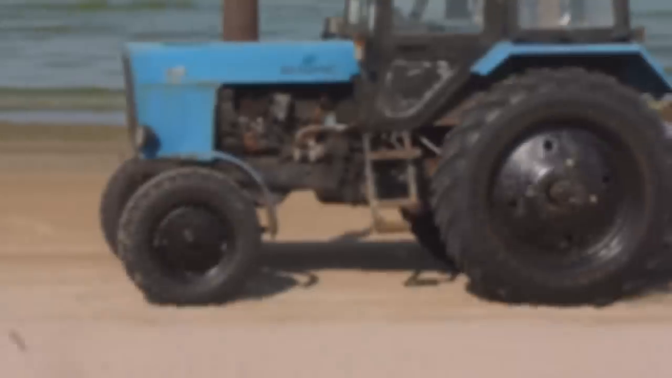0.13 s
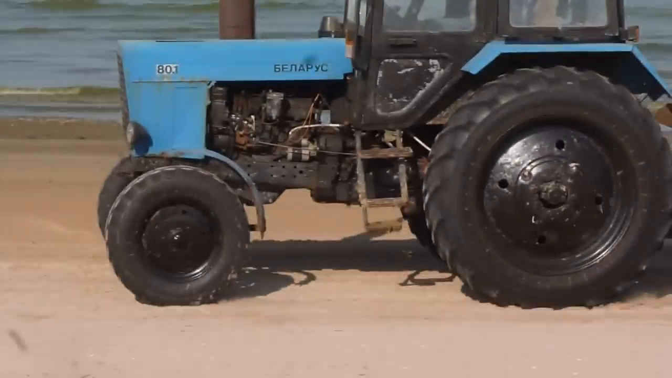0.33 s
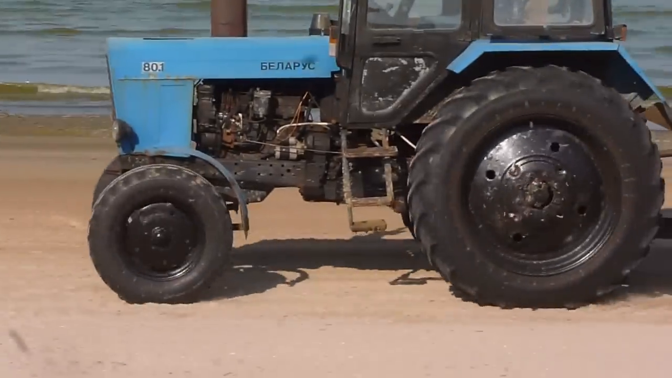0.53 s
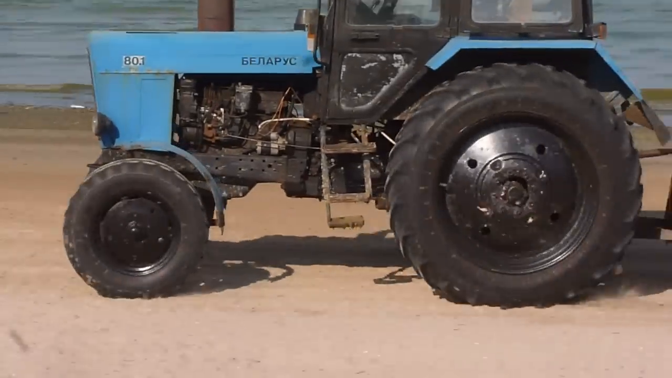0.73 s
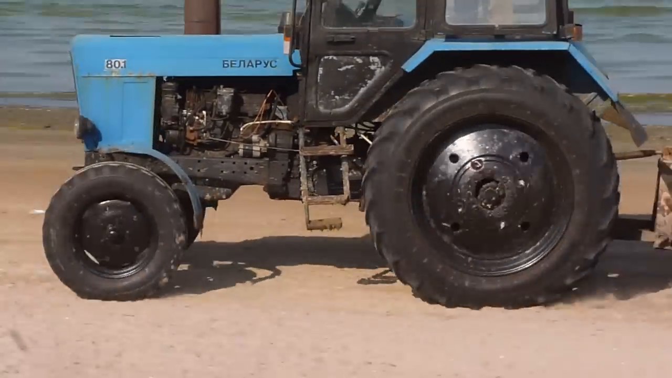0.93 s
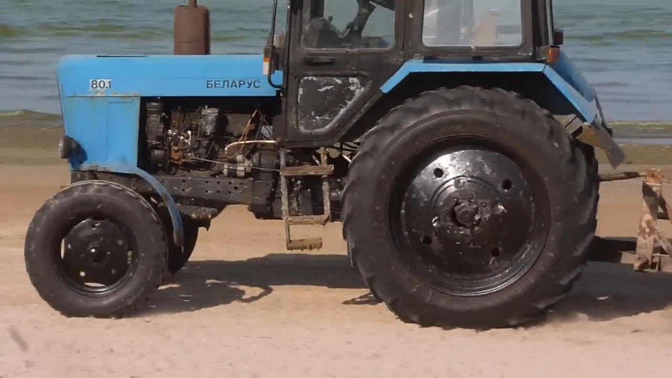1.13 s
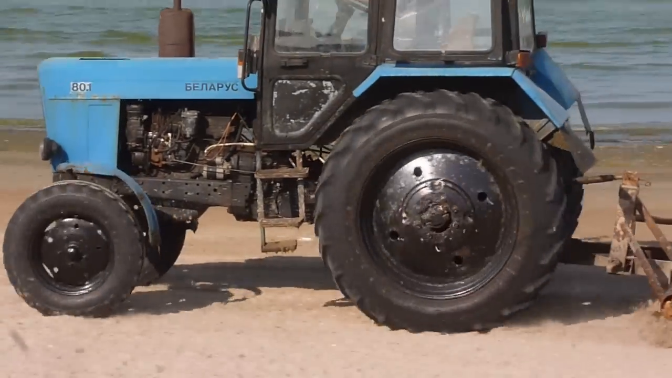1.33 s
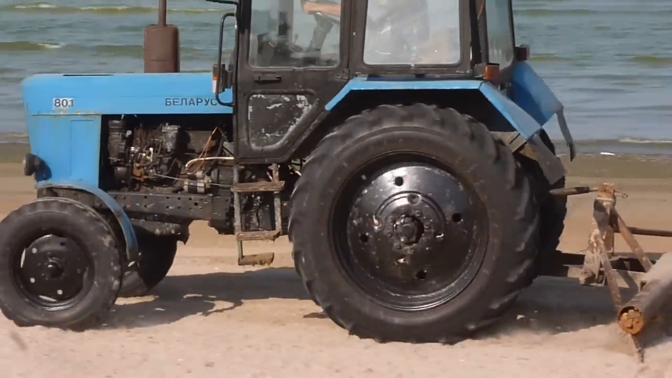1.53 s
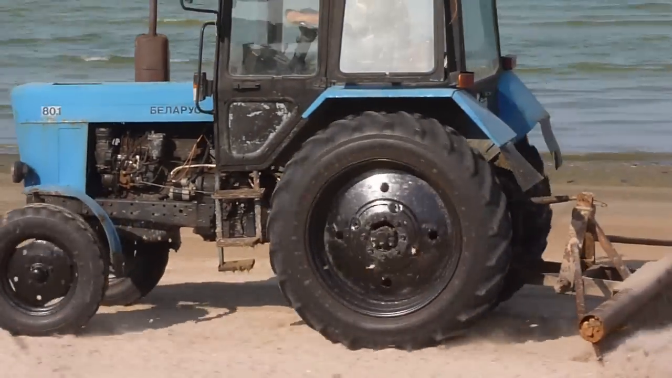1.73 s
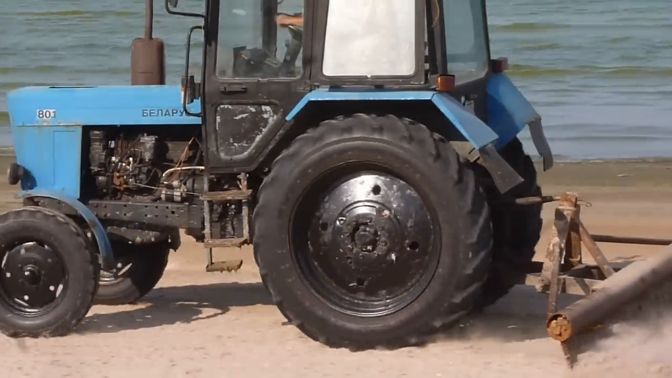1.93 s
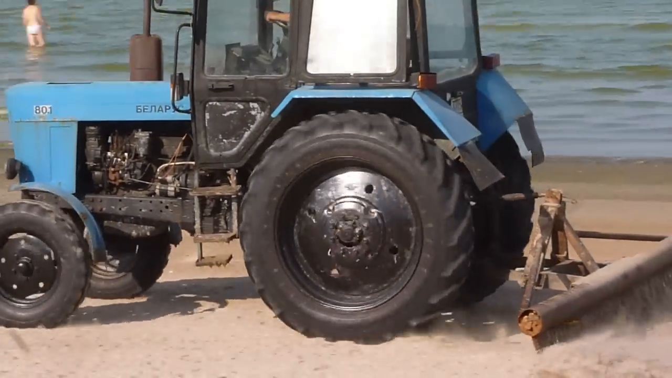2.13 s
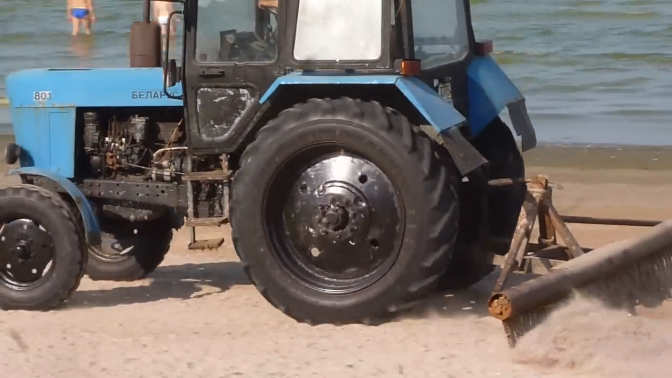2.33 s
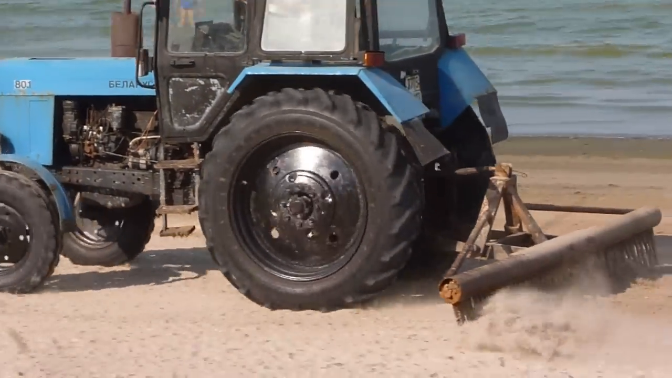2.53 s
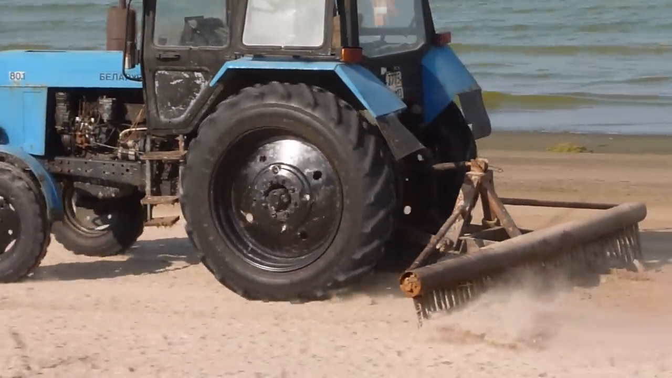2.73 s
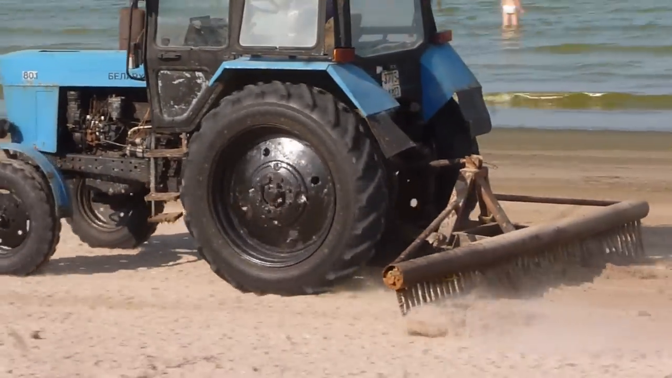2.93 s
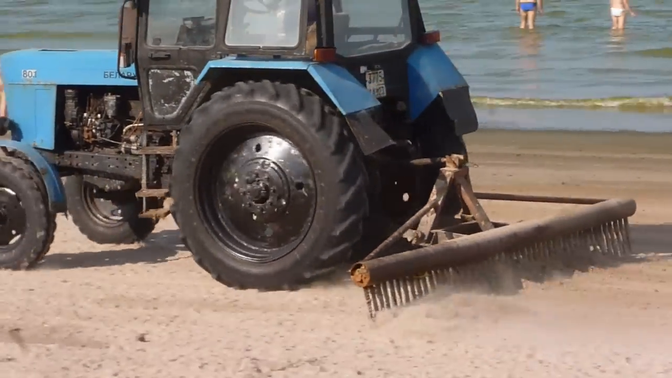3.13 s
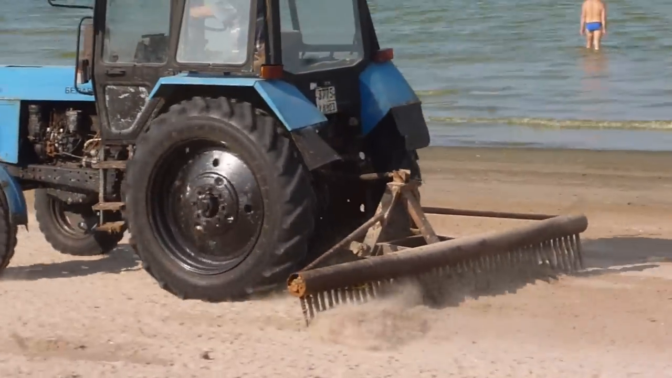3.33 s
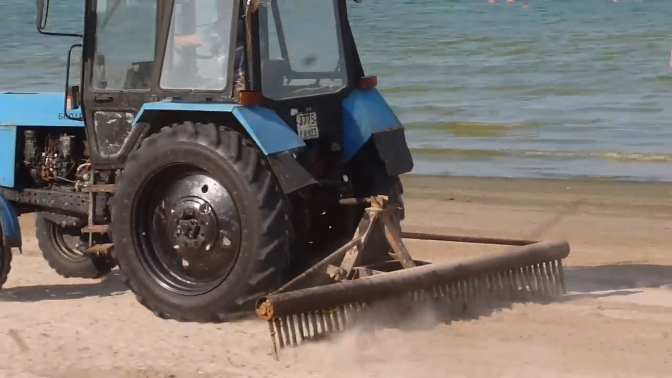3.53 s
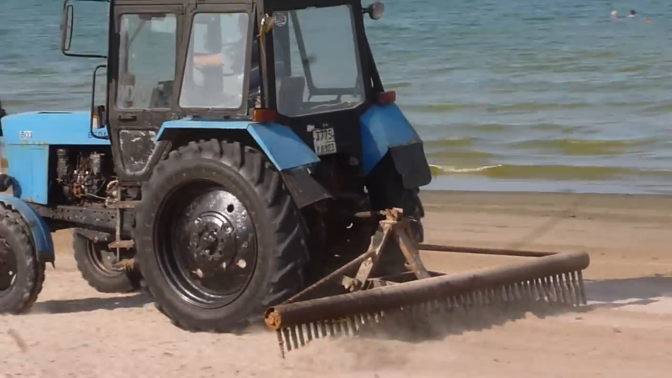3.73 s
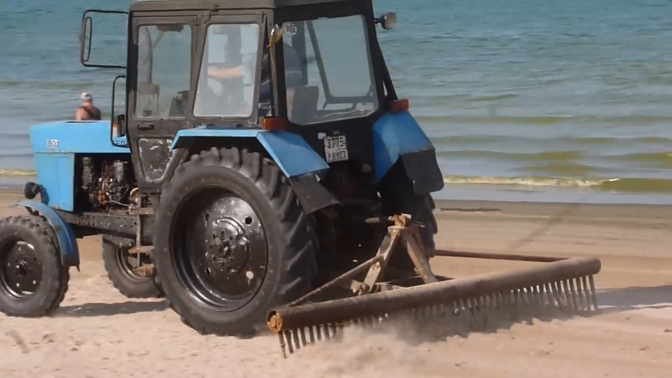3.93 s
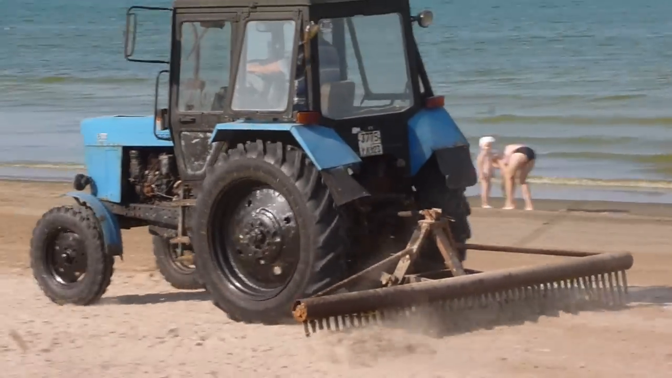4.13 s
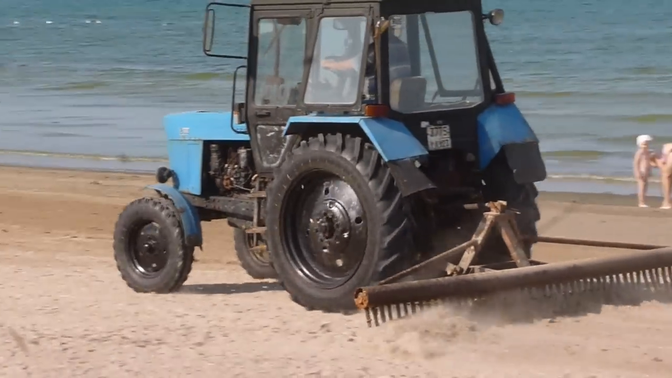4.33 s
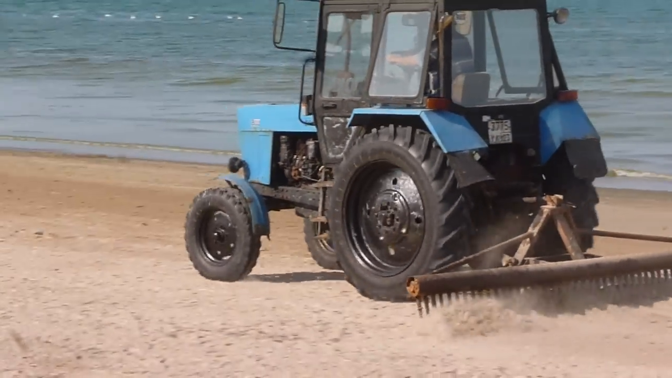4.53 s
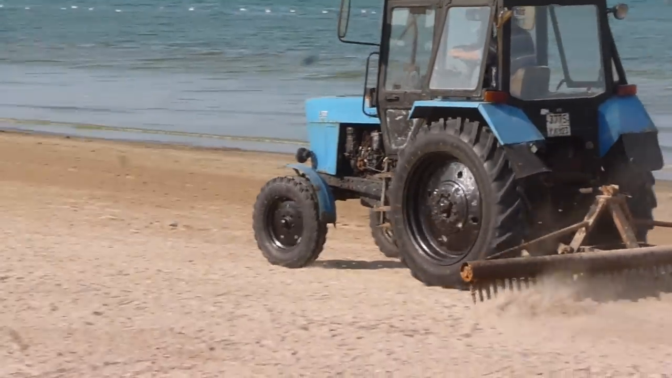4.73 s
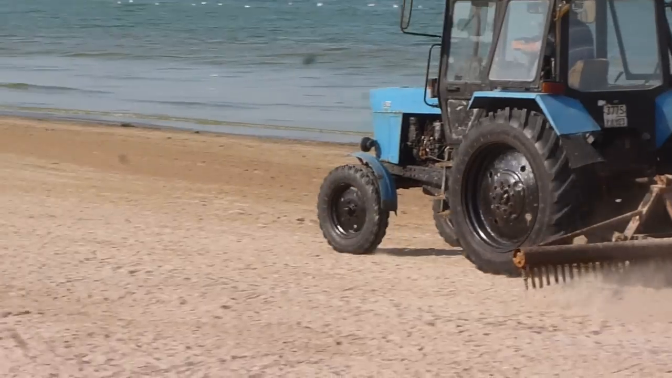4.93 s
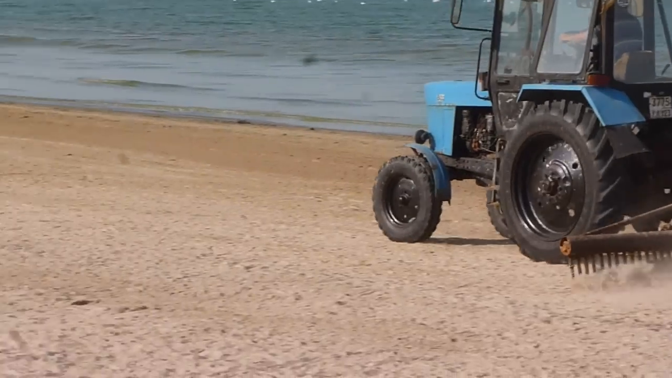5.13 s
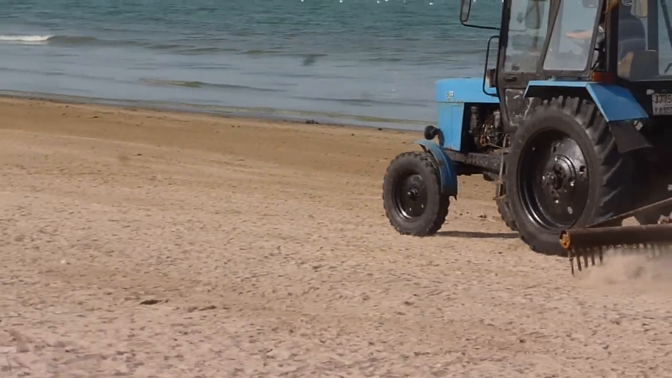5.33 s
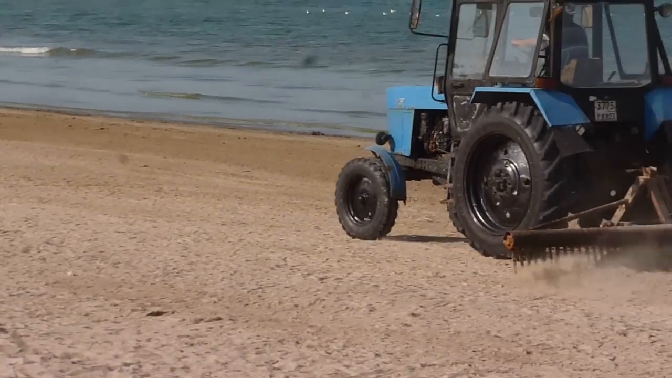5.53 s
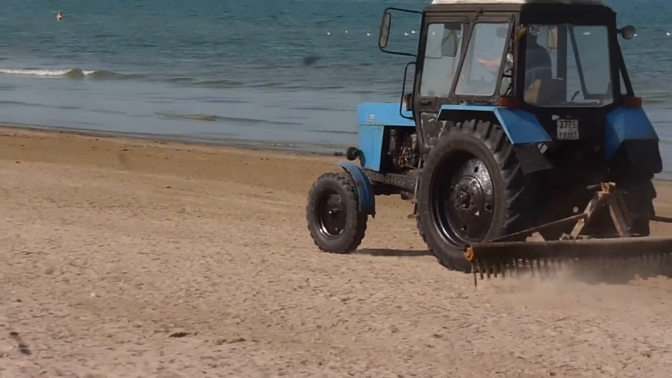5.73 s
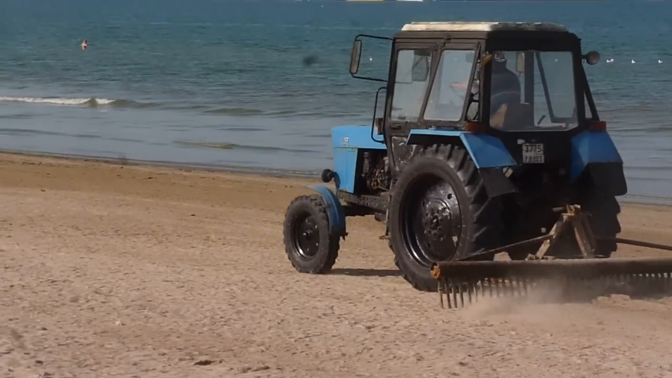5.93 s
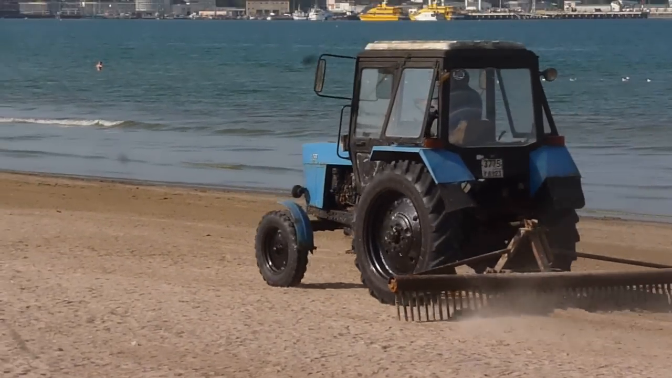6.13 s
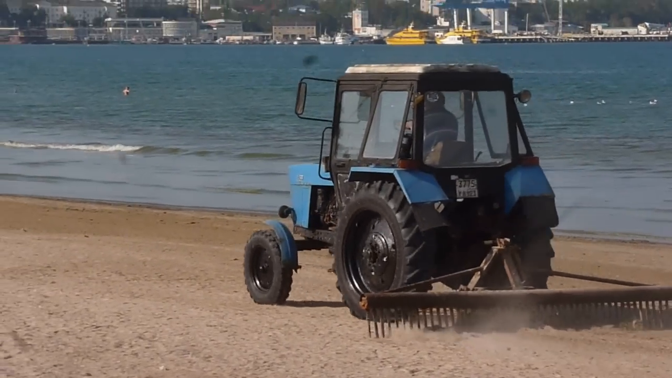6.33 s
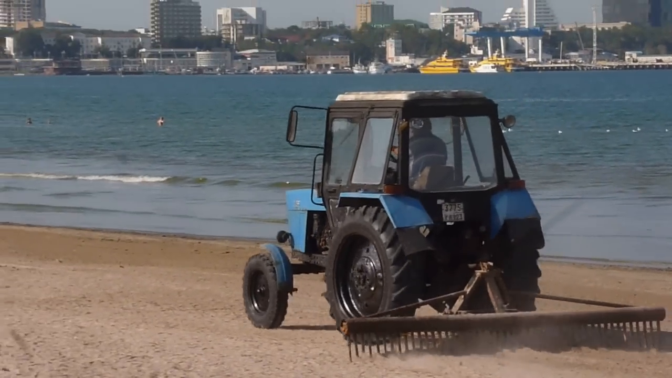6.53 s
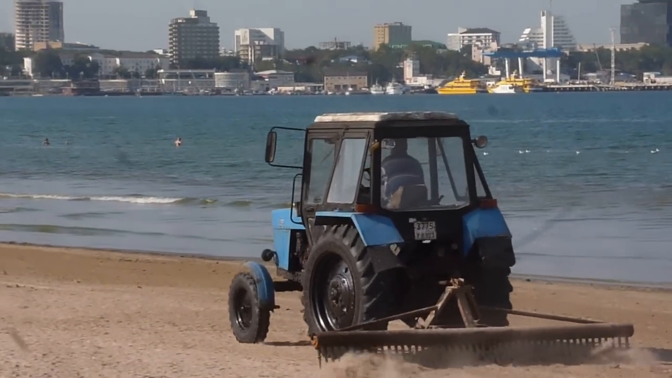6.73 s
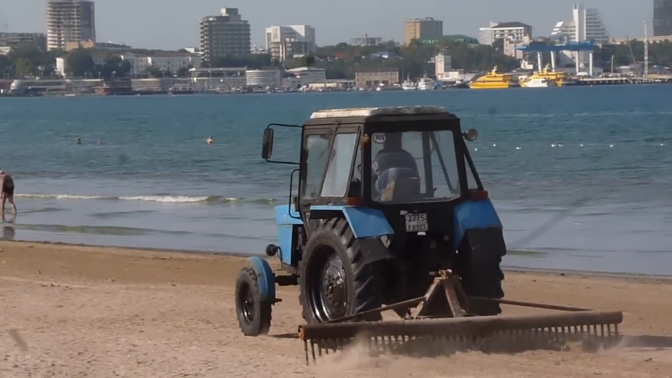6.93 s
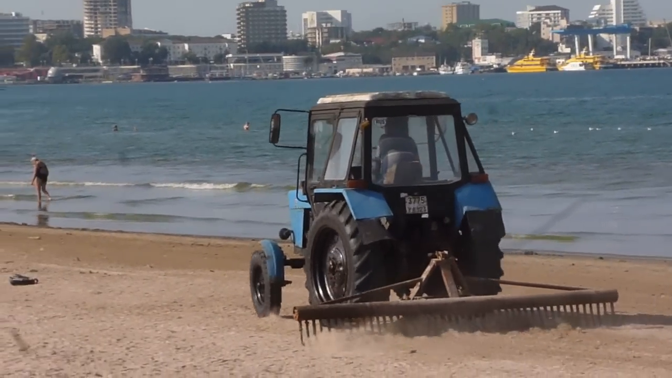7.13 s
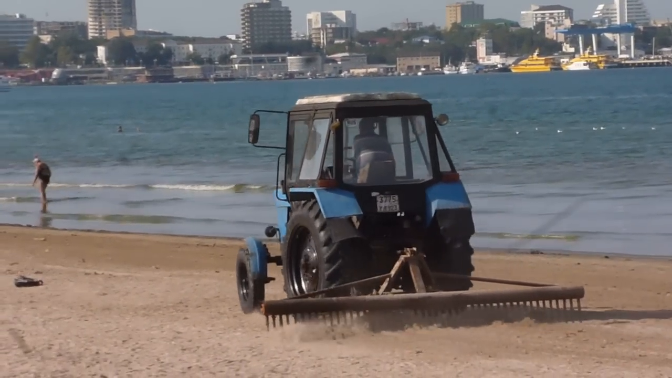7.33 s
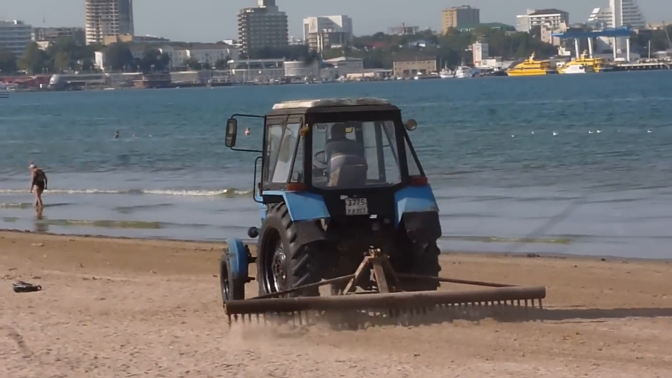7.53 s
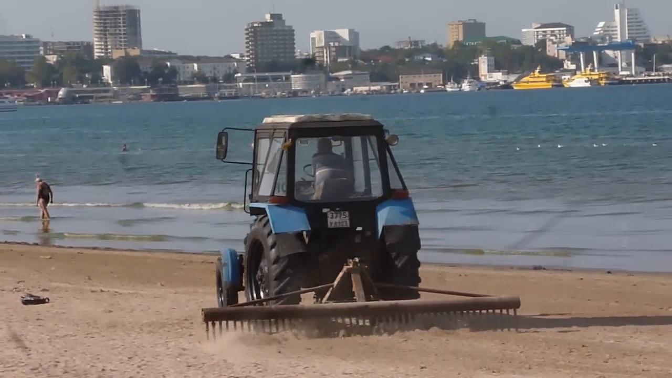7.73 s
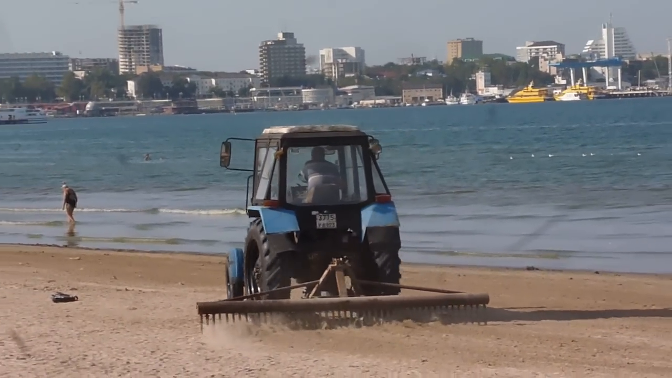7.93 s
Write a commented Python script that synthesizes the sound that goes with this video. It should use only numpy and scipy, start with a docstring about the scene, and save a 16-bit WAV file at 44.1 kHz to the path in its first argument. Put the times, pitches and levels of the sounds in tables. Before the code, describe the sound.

A tractor's diesel engine clatters close by on an open beach, heard through a small microphone with little bass. It is loudest in the first 2 seconds, a fast knocking over a whirr and drone, with faint steel chirps until about 1.5 seconds. A towed harrow hisses faintly through the sand underneath. From about 2 seconds wind starts to sputter on the microphone, and near 2.6 seconds the engine drops in level. The harrow's steel links clink three times around 3 seconds. From about 3.5 to 7 seconds irregular gusts buffet the microphone while the tractor draws away, its engine fading and slowing slightly under load. From about 5 seconds the hitch rings very faintly with the engine's beat. The wind eases a little after 7 seconds, and a few soft clinks come near 8 seconds with the more distant engine still running.

```python
"""An open beach, a small camera microphone with little bass, a tractor passing six metres away.
First the four-cylinder diesel clatters side-on, loose steel chirping, its harrow combing the sand.
From about 2 s a sea breeze sputters on the microphone; then the rear wheel screens the engine bay
and the harrow's links clink. Amid gusts the tractor draws off, its engine slowing under load.
From about 5 s it is heard from behind, the hitch ringing faintly, with a few last clinks at the end."""
import sys
import numpy as np
from scipy import signal
from scipy.fft import rfft, irfft, next_fast_len
from scipy.io import wavfile
from scipy.ndimage import map_coordinates

SR = 44100
rng = np.random.default_rng(int(sys.argv[2]) if len(sys.argv) > 2 else 0)


def log_audio(samples):
    """Write samples as a 16-bit WAV file to the path given in sys.argv[1]."""
    # one column per channel
    frames = np.atleast_2d(samples).T
    # limit to full scale, then quantise
    limited = np.clip(frames, -1, 1)
    pcm = np.round(limited * 32767).astype(np.int16)
    wavfile.write(sys.argv[1], SR, pcm)


N = 355754


def amp(db):
    """Decibels to gain."""
    return 10 ** (np.asarray(db) / 20)


def unit(x):
    """Scale to rms 1."""
    return x / np.sqrt(np.mean(x ** 2) + 1e-20)


def along(points, hz):
    """(f/Hz, value) points read on a log frequency axis."""
    f, v = np.transpose(points)
    return np.interp(np.log(hz + 1), np.log(f + 1), v)


def curve(rows):
    """(t/s, value) rows as one value per sample."""
    return np.interp(np.arange(N) / SR, *np.transpose(rows))


def wobble(rate):
    """A smooth random curve, rate knots a second."""
    knots = rng.standard_normal(int(N * rate / SR) + 4)
    return map_coordinates(knots, [np.arange(N) * rate / SR])


def coloured(x, db_of_hz):
    """A causal filter with the given gain, so that resonances ring after each blow."""
    size = 2 * next_fast_len(N // 2 + 8192)
    cepstrum = irfft(np.log(amp(db_of_hz(np.fft.rfftfreq(size, 1 / SR)))))
    cepstrum[1:size // 2] *= 2  # fold to minimum phase
    cepstrum[size // 2 + 1:] = 0
    return irfft(rfft(x, size) * np.exp(rfft(cepstrum)))[:N]


def pulses(times, sizes):
    """Impulses of the given sizes at the given seconds."""
    at = np.round(times * SR).astype(int)
    inside = (at >= 0) & (at < N)
    return np.bincount(at[inside], sizes[inside], N)


def swell(x, rise_s, fall_s):
    """Each impulse becomes a hump that rises and dies away."""
    t = np.arange(SR // 8) / SR
    hump = (1 - np.exp(-t / rise_s)) * np.exp(-t / fall_s)
    return signal.fftconvolve(x, hump / hump.max())[:N]


def firings():
    """The number of firings so far, at every sample, as the diesel slows under load."""
    # firing rate: t/s, f/Hz
    firing_rate = [(0, 74.08), (.6, 73.48), (1.2, 73.38), (2, 72.26), (2.8, 72.76), (3.4, 71.59),
                   (3.9, 69.2), (4.6, 68.96), (5.3, 68.42), (5.9, 65.67), (6.5, 63.22), (7.2, 64.24),
                   (8.07, 63.37)]
    return np.cumsum(curve(firing_rate)) / SR


def every_cycle(blows, jitter_s, scatter_db, cylinders=4):
    """A pattern of blows, repeated a little unevenly in every engine cycle."""
    # screened by the wheel, the blows sound more alike: t/s, factor on their accents in dB
    contrast = [(2.2, 0.96), (3.9, 0.34), (5.4, .3), (6.8, 1.4)]
    count = firings()
    place, db = np.transpose(blows)
    cycle_starts = np.arange(0, count[-1] - cylinders / 2, cylinders)
    places = (cycle_starts[:, None] + place).ravel()
    times = np.interp(places, count, np.arange(N) / SR, right=N)
    late, louder = rng.standard_normal((len(places), 2)).T
    typical_db = 10 * np.log10(np.mean(amp(db) ** 2))
    accents = np.resize(db - typical_db, len(places)) * np.interp(times, *np.transpose(contrast))
    return pulses(times + jitter_s * late, amp(accents + scatter_db * louder))


def combustion(knock_db=-1, knock_top_hz=850, grit_db=1.16):
    """Pistons knock the block amid injector and valve clatter, over the whirr of gears and fan."""
    # combustion and piston slap in one cycle: place/firing periods, relative level/dB
    knock_pattern = [(.53, -1), (1.1, -5.5), (1.48, -8.5), (2.02, -10), (2.48, 2), (3.2, -16.5),
                     (3.78, -10)]
    # injector and valve bursts in one cycle: place/firing periods, relative level/dB
    burst_pattern = [(.25, 0), (.55, -3), (1.32, -5.5), (2.34, -3.8), (2.63, -10), (3.42, -.3)]
    # spectrum of gears and fan: f/Hz, level/dB
    whirr_colour = [(200, -2), (700, 2.3), (1500, 1.2), (3000, -3.8), (5000, -5.8)]
    knocks = unit(every_cycle(knock_pattern, jitter_s=.00007, scatter_db=1.5))
    # the pressure rise takes time, so the knock has little treble
    knocks = coloured(knocks, lambda hz: -10 * np.log10(1 + (hz / knock_top_hz) ** 4))
    blows = every_cycle(burst_pattern, jitter_s=.0003, scatter_db=1.1)
    bursts = unit(swell(blows, rise_s=0.003, fall_s=0.0058) * rng.standard_normal(N))
    # small steel parts radiate mostly treble
    clatter = coloured(bursts, lambda hz: along([(200, -8.5), (900, -6.5), (2500, -2.0)], hz))
    grit = unit(amp(grit_db * wobble(500)) * rng.standard_normal(N))
    whirr = coloured(grit, lambda hz: along(whirr_colour, hz))
    return clatter + whirr + amp(knock_db) * knocks


def dips_db(fall_s=0.058):
    """The tractor's level dips briefly now and then."""
    # dips at their deepest: t/s, depth/dB, recovery/s
    dips = [(1.68, 1.5, 0.13), (2.26, 5.5, 0.21), (2.64, 7.5, 0.067), (2.9, 3.5, 0.15), (3.26, 4, 0.056),
            (3.62, 6, 0.15), (3.9, 3.5, 0.041), (4.8, 3.5, 0.032), (5.8, 4, 0.12), (6.09, 4, 0.14),
            (7.75, 3, 0.16)]
    t = np.arange(N) / SR
    return sum(np.interp(t, [s - fall_s, s, s + recovery], [0, depth, 0]) for s, depth, recovery in dips)


def passing_db(nearest_db=-34.5, nearest_s=0.71, nearest_m=6.04, speed_m_per_s=2.25):
    """The engine's level at the microphone falls with distance and screening, with brief dips."""
    # rear wheel and cab in front of the engine bay: t/s, loss/dB
    screen = [(2.5, -0.5), (2.7, 6.5), (3.2, 3.5), (3.45, 6.5), (4.0, 8), (4.35, 12), (5.15, 13.5),
              (5.7, 11.5), (6.35, 14), (6.8, 16), (7.1, 12.5), (8.07, 11)]
    t = np.arange(N) / SR
    spread_db = 20 * np.log10(np.hypot(1, speed_m_per_s * (t - nearest_s) / nearest_m))
    return nearest_db - spread_db - curve(screen) - dips_db()


def sand_bounce(sound, longer=1.121, second_share=0.32):
    """The engine also arrives off the sand, from two heights; the hollow colour glides with the paths."""
    # the shorter bounce: t/s, delay/ms, share of the direct sound
    bounce = [(0, 1.65, 0.17), (1.7, 1.64, 0.12), (2.7, 1.72, 0.3), (3.5, 1.604, 0.26), (4.8, 1.706, 0.12),
              (6.8, 1.8, 0.11), (8.07, 1.58, 0.16)]
    delay = curve([(s, ms) for s, ms, _ in bounce]) * SR / 1000
    share = curve([(s, part) for s, _, part in bounce])
    late = lambda samples: map_coordinates(sound, [np.arange(N) - samples])
    return sound + share * (late(delay) + second_share * late(longer * delay))


def engine():
    """Combustion shakes panels and hitch; the colour shifts as the tractor shows its back."""
    # face towards the microphone: t/s, face (0 side, 1 rear quarter, 2 rear)
    facing = [(0, 0), (1.3, 0.097), (2.1, 0.42), (2.4, 0.49), (3.45, 1.08), (4.2, 1.3), (5.5, 2.08)]
    # broad colour of each face: f/Hz, side level/dB, quarter level/dB, rear level/dB
    faces = [(50, -61, -42.5, -44.5), (99, -31.5, -16.5, -6), (167, -16.5, -11.5, 2), (280, -6.5, 3.5, 4),
             (430, -8.5, -5.5, -6), (592, 1.5, 1.5, 0), (860, 3, 7, 1.5), (1500, 2.5, 5, 3),
             (2410, 0.5, 3.5, 1), (3300, 4.5, 5, 3), (4500, -2, -0.5, -5.5), (5540, -6, -6.5, -9.5),
             (6770, -19, -16.5, -20), (7730, -39.5, -38, -38)]
    # block, bonnet and cab resonances: f/Hz, width/Hz, side lift/dB, quarter lift/dB, rear lift/dB
    panels = [(233.4, 15, 11, 0, 0), (598.6, 15, 4.5, 5.5, -2), (728, 42, 6, 5.5, 0.5),
              (1040, 22, -6, 6, 6.5), (1132, 12, 5, 0.5, 0), (1166, 70, 1, 1.5, 3.5), (1750, 47, -1, 3, -2),
              (1910, 110, 0, -3.5, -1.5), (2180, 60, 4.5, 3.5, 3), (2490, 75, -2, -6.5, 2),
              (2700, 166, 4, 3, 1.5), (3520, 80, 3.5, 0, 1.5), (3980, 53, -4, -2.5, -1),
              (4086, 75, 5.5, -1, 2)]
    drive, aspect = combustion(), curve(facing)
    treble = signal.butter(4, [1800, 7000], "band", fs=SR, output="sos")
    sound = np.zeros(N)
    for face in range(3):
        colour = [(f, levels[face]) for f, *levels in faces]
        resonances = lambda hz: sum(lifts[face] * np.exp(-((hz - f) / width) ** 2)
                                    for f, width, *lifts in panels)
        voice = coloured(drive, lambda hz: along(colour, hz) + resonances(hz))
        voice /= signal.sosfilt(treble, voice).std()  # all faces are equally loud in the treble
        sound += np.clip(1 - abs(aspect - face), 0, 1) * voice
    return amp(passing_db()) * sand_bounce(sound) + hitch(drive)


def chirps(level_db=-5):
    """At close range loose steel on the engine pings, each time on its own slightly rough note."""
    # pings: t/s, relative peak level/dB, f/Hz
    pings = [(0.046, -23, 3400), (0.0604, -24, 3530), (0.2638, -24, 3630), (0.4808, -21, 3540),
             (0.644, -22, 3680), (0.7008, -23, 3500), (0.825, -23, 4110), (0.9183, -23.5, 3530),
             (1.2012, -23, 3620), (1.3638, -23, 3420)]
    t = np.arange(SR // 25) / SR
    hump = (1 - np.exp(-t / .004)) * np.exp(-t / .004)
    sound = np.zeros(N + SR)
    for s, db, hz in pings:
        drift = np.cumsum(rng.normal(0, 0.052, len(t)))
        note = np.sin(2 * np.pi * hz * t + drift)
        sound[round(s * SR):][:len(t)] += amp(db + level_db) * hump / hump.max() * note
    return sound[:N]


def drone(waver_db=2.0, waver_rad=0.3):
    """Clean engine orders swell and fade as their lobes of radiation sweep past the microphone."""
    # exhaust, block and belt-driven parts: multiple of the cycle rate, level/dB, loudest t/s, spread/s
    tones = [(4, -82, .8, 1.5), (13.5, -55.5, 1.0, 1.0), (27, -57, .8, .9), (37, -47.5, .9, .8),
             (40, -43.5, 1.48, .34), (40, -53, 3.15, .25), (57, -54, 2, 1.3), (57, -46, 2.48, .08),
             (62, -54.5, 2.2, .9)]
    t = np.arange(N) / SR
    cycles = firings() / 4
    sound = np.zeros(N)
    for multiple, db, s, spread in tones:
        beam = amp(db + waver_db * wobble(3.9)) * np.exp(-((t - s) / spread) ** 2 / 2)
        sound += beam * np.sqrt(2) * np.sin(2 * np.pi * multiple * cycles + waver_rad * wobble(12))
    return sound


def harrow(clink_db=-9, sand_db=-56, sand_fade_db_per_s=0.8):
    """Loose steel links clink while the tines hiss through the sand, fainter as they draw away."""
    # links striking: t/s, relative level/dB
    clinks = [(2.8544, -44), (3.018, -33.5), (3.184, -31), (7.8481, -50), (7.895, -50), (7.9748, -45.5)]
    # modes of a link: f/Hz, relative level/dB, t60/s
    link_modes = [(2930, 8.5, 0.055), (3510, 1.5, 0.05), (4200, 4, 0.035), (4670, 0, 0.055),
                  (5400, -18, 0.036)]
    # spectrum of combed sand: f/Hz, relative level/dB
    sand_colour = [(60, -25.5), (250, 7.5), (1000, 2), (3000, -1), (5000, -1.5), (7500, -34.5)]
    t = np.arange(SR // 8) / SR
    attack = 1 - np.exp(-t / 0.00073)
    links = np.zeros(N + SR)
    for s, db in clinks:
        ring = np.zeros(len(t))
        for hz, level, t60 in link_modes:
            decay = amp(level + rng.normal(0, 2.6) - 60 * t / t60)
            ring += decay * np.sin(2 * np.pi * hz * rng.normal(1, 0.009) * t)
        scrape = amp(-60 * t / 0.0085) * rng.standard_normal(len(t))
        links[round(s * SR):][:len(t)] += amp(db + clink_db) * (ring + scrape) * attack
    hiss = unit(coloured(rng.standard_normal(N), lambda hz: along(sand_colour, hz)))
    hiss_db = sand_db + wobble(4.1) - sand_fade_db_per_s * np.arange(N) / SR
    return links[:N] + amp(hiss_db) * hiss


def wind_strength(rise_s=0.0059, fall_s=0.015, sag_db=0.9):
    """Each gust rises quickly, sags a little while it holds and falls back into the breeze."""
    # sea breeze on the microphone between gusts: t/s, level/dB
    breeze = [(0, -65), (2.05, -65), (2.2, -55.5), (3.45, -54.5), (4.4, -47.5), (5.6, -51), (6.6, -49.5),
              (6.68, -56), (6.72, -49), (7.53, -56), (7.64, -62.5), (8.07, -56)]
    # gusts: start t/s, length/s, level/dB
    gusts = [(2.595, 0.074, -40.5), (3.02, 0.05, -47.5), (3.574, 0.17, -41.5), (3.832, 0.085, -41),
             (4.051, 0.05, -40.5), (4.16, 0.076, -44), (4.291, 0.076, -43.5), (4.365, 0.17, -42),
             (4.505, 0.55, -44.5), (5.169, 0.11, -41), (5.319, 0.19, -44.5), (5.714, 0.14, -47.5),
             (5.869, 0.066, -44.5), (6.016, 0.056, -44), (6.12, 0.53, -47), (6.921, 0.083, -44),
             (7.07, 0.073, -48.5), (7.216, 0.18, -52.5), (7.79, 0.049, -48.5)]
    t = np.arange(N) / SR
    power = amp(curve(breeze)) ** 2
    for s, length, db in gusts:
        corners = [s - rise_s / 2, s + rise_s / 2, s + length - fall_s / 2, s + length + fall_s / 2]
        shape = np.interp(t, corners, [0, 1, amp(-sag_db), 0])
        power += (amp(db) * shape) ** 2
    return np.sqrt(power)


def sputter(lumps_db=3.0):
    """Small eddies break on the microphone port, as strongly as the wind blows."""
    # spectrum of the eddies: f/Hz, relative level/dB
    eddy_colour = [(25, -58.5), (45, -38.5), (70, -30), (110, -18), (160, -6), (250, 2), (400, 3.5),
                   (600, -2.5), (900, -6.5), (1400, -10), (2200, -32), (5000, -61)]
    lumps = amp(lumps_db * wobble(230)) * rng.standard_normal(N)
    return wind_strength() * unit(coloured(lumps, lambda hz: along(eddy_colour, hz)))


def buffets(level_db=-1.27, width_cycles=0.64, flank_db=-8.5, spacing_s=0.003):
    """A large eddy gives one sharp swing of pressure, closely flanked by two weak ones."""
    # buffets on the microphone: t/s, relative peak level/dB, centre f/Hz
    hits = [(2.608, -33, 450), (2.645, -32, 330), (2.666, -27.5, 596), (2.72, -38.5, 320), (2.8, -36, 300),
            (2.885, -37.5, 300), (3.103, -34, 310), (3.182, -41, 320), (3.37, -42, 300), (3.58, -34, 554),
            (3.671, -29, 429), (3.867, -27, 620), (3.9, -30.5, 553), (3.909, -32, 555), (3.96, -30, 440),
            (4.054, -29, 690), (4.077, -30.5, 458), (4.091, -28.5, 856), (4.172, -27, 585),
            (4.204, -26, 731), (4.382, -26, 497), (4.453, -27.5, 377), (4.493, -27, 602), (4.542, -29, 575),
            (4.577, -30, 513), (4.731, -31, 413), (4.759, -22.5, 503), (4.769, -31, 546), (4.8, -29, 510),
            (4.865, -33, 452), (4.922, -27.5, 535), (4.987, -26.5, 444), (5.102, -30, 544),
            (5.111, -29, 505), (5.176, -28.5, 532), (5.214, -26, 609), (5.234, -33, 443), (5.327, -30, 554),
            (5.363, -33.5, 449), (5.608, -35, 426), (5.747, -30, 870), (5.755, -26.5, 780),
            (5.803, -31, 489), (5.897, -32.5, 620), (6.024, -32, 689), (6.061, -26.5, 473),
            (6.147, -32, 525), (6.222, -33, 589), (6.311, -31, 477), (6.364, -29.5, 693),
            (6.486, -31.5, 476.4), (6.527, -30, 457), (6.782, -33, 705), (6.924, -32.5, 659),
            (6.941, -35.5, 550), (7.096, -31.5, 824), (7.284, -33.5, 579), (7.353, -35, 597),
            (7.375, -33.5, 500), (7.598, -34.5, 413), (7.742, -36, 381), (7.819, -31, 585),
            (7.847, -32.5, 323), (7.886, -38.5, 407), (7.986, -35.5, 447), (8.047, -36.5, 424.6)]
    air = np.zeros(N + SR)
    t = np.arange(-SR // 100, SR // 50) / SR
    for s, db, hz in hits:
        for flank, (late, phase) in zip((-1, 0, 1), rng.standard_normal((3, 2))):
            cycles = (t - flank * spacing_s * np.exp(0.32 * late)) * hz
            eddy = np.exp(-(cycles / width_cycles) ** 2) * np.sin(2 * np.pi * cycles + phase)
            air[round(s * SR) - SR // 100:][:len(t)] += amp(db + level_db + abs(flank) * flank_db) * eddy
    return coloured(air[:N], lambda hz: along([(30, -33.5), (80, -18.5), (200, 0.5)], hz))


def hitch(drive):
    """The steel of the hitch rings with the engine's beat, heard once the tractor shows its back."""
    # modes of the hitch: f/Hz, width/Hz, relative level/dB
    modes = [(1704, 45, 1), (2203, 45, -4), (2960, 90, -5)]
    # ringing at the microphone, apart from the dips: t/s, level/dB
    ring_level = [(4.8, -75), (5.7, -65.5), (6.1, -66), (6.9, -69), (7.3, -68), (8.07, -61)]
    power = lambda hz: sum(amp(db) ** 2 / (1 + ((hz - f) / width) ** 2) ** 2 for f, width, db in modes)
    ring = unit(coloured(drive, lambda hz: 10 * np.log10(power(hz))))
    return amp(curve(ring_level) - dips_db()) * ring


def scene():
    """Tractor, harrow and wind on the open beach, in mono."""
    return (engine() + chirps() + drone() + harrow() + sputter() + buffets())[None]


def record(dry):
    """The camera keeps nothing above its band limit."""
    top_hz = 7700
    size = next_fast_len(N + 8192)
    hz = np.fft.rfftfreq(size, 1 / SR)
    return irfft(rfft(dry, size) / np.sqrt(1 + (hz / top_hz) ** 160), size)[:, :N]


dry = scene()
out = record(dry)
log_audio(out)
```